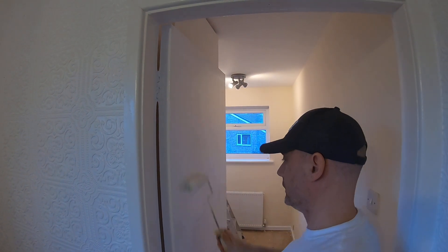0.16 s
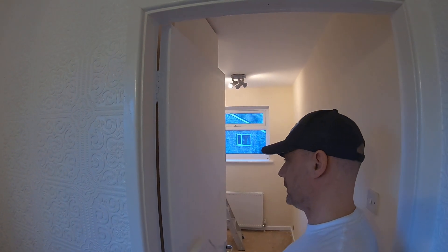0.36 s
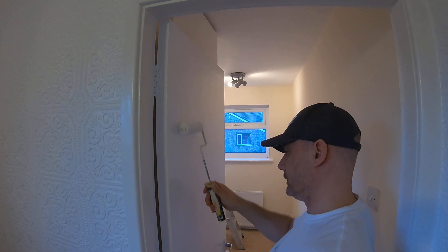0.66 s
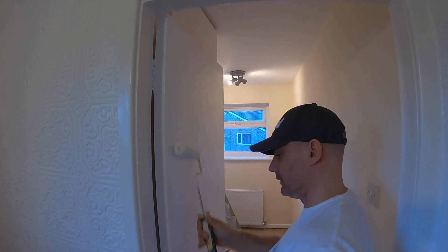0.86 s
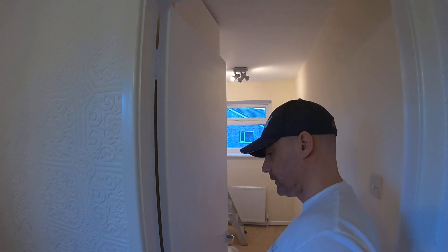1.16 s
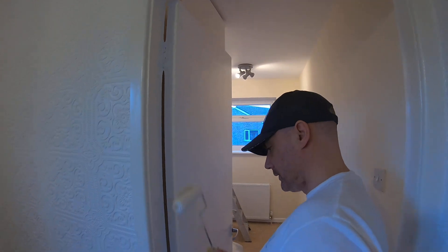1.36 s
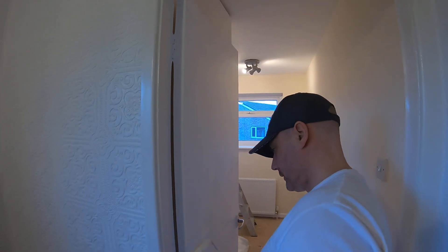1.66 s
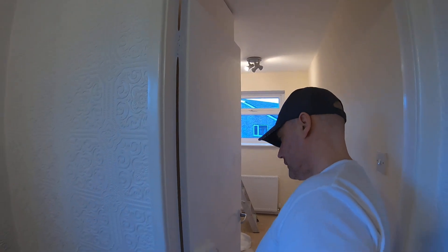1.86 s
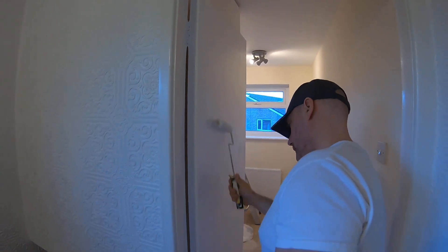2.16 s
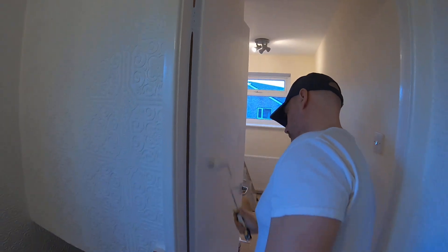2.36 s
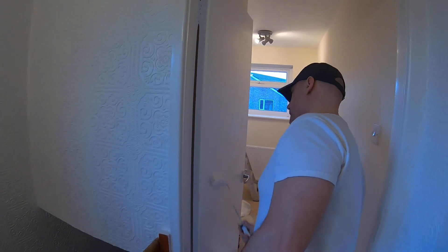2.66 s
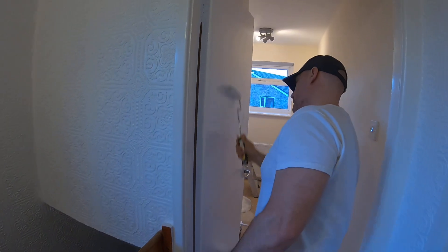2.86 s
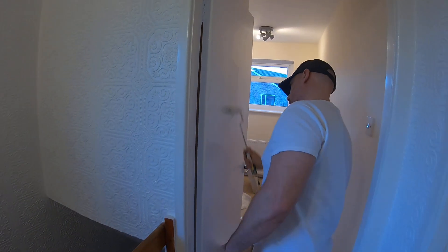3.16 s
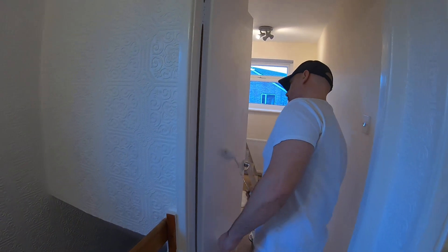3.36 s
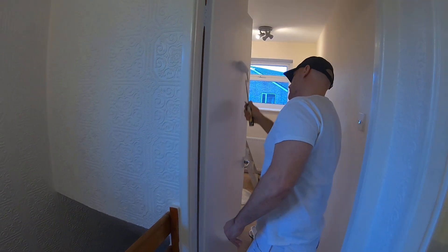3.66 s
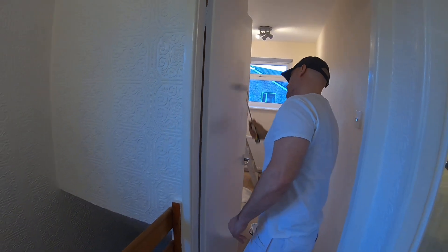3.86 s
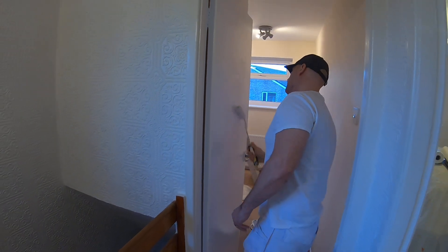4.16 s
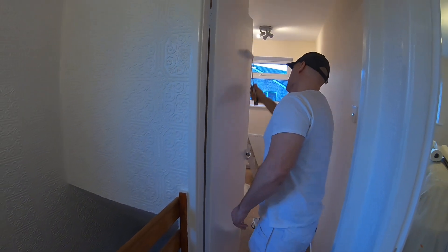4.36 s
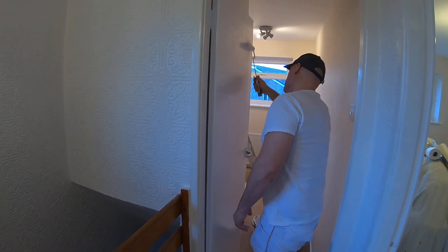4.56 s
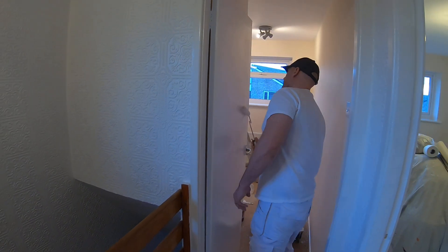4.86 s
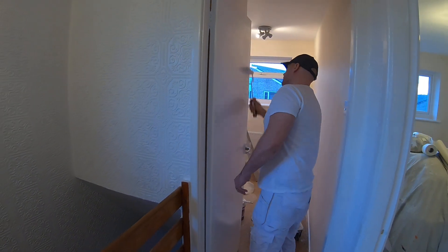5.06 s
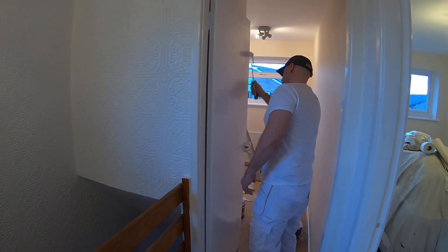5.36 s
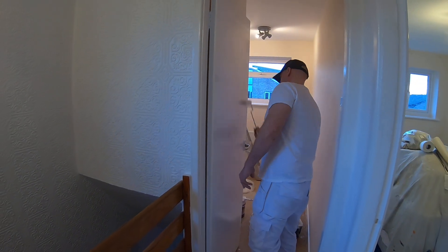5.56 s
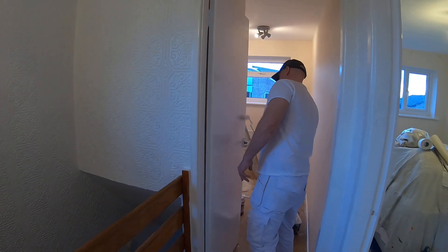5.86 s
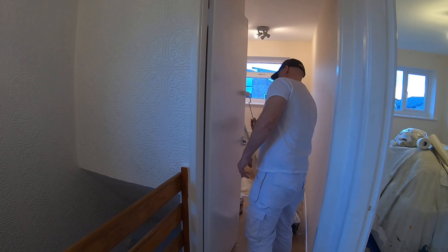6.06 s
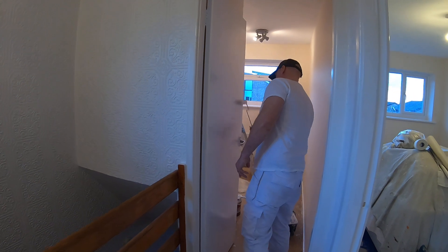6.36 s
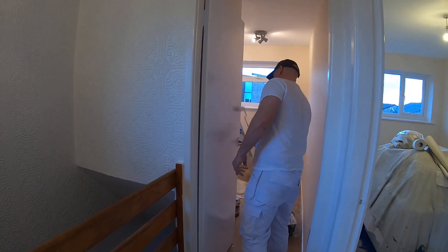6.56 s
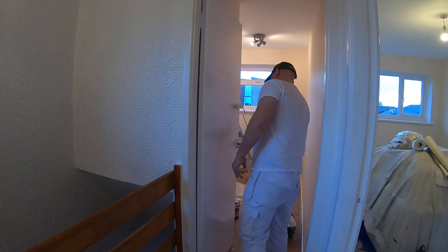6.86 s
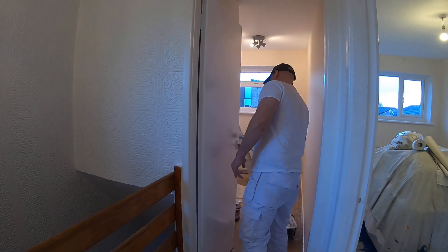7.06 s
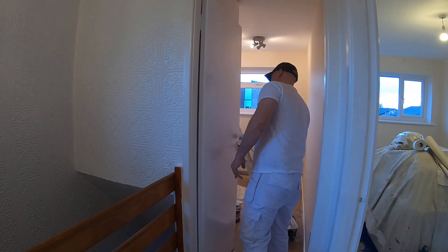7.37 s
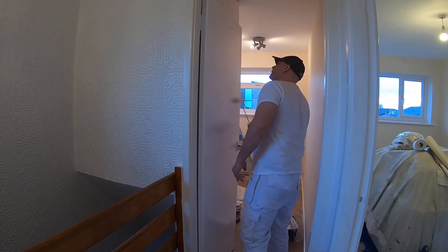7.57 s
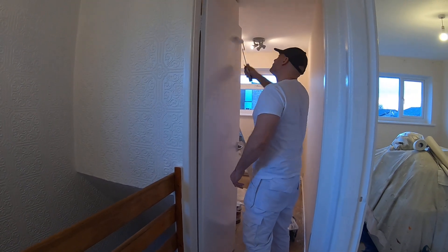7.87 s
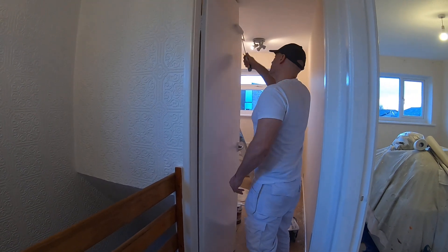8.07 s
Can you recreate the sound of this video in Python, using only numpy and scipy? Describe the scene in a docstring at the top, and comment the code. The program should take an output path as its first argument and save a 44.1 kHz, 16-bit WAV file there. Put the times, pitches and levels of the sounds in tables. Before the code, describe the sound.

A wet paint roller is already moving over a door in a small bare room, close to a hand-held stereo microphone. Strokes of about 0.3 to 0.5 seconds swell and soften at each turn, mixing sticky high sizzle, airy swish and a low, lumpy panel drone; the first strokes are brightest and loudest. A rough chafe comes at 1.2 s, and dull handling bumps from 1.4 s. From 1.8 to 4 s the microphone backs away and the crackle blurs into hiss. At about 2.3 s a short scuff runs into a hard, loud knock, mainly on the right, with a low sway after it. Rolling continues with finger rumbles. At 4.7 s a heavy double thud booms through the floor boards. From 5.9 s strokes grow fainter and quicker, with low chafes near 6.8 to 7.5 s, then a fuller droning stroke and soft bump around 7.8 to 8 s. The house stays quiet.

```python
"""A paint roller goes up and down a door in a small bare room, heard from a hand-held camera, over a quiet house.
From the start, each stroke speeds up and slows for the turn: random clicks and noise, coloured three ways, make
the wet nap sizzle, the sleeve swish and the door drone. Bursts of stick and slip chafe, and fingers rumble on the camera.
Bumps from 1.4 s ring the camera's case and mount; it backs away from 1.8 to 4 s, blurring the clicks into hiss.
At 2.3 s a scuff runs into a hard knock, mostly on the right; at 4.7 s a heavy double thud rings the floor boards."""
import sys
import numpy as np
from scipy import signal
from scipy.fft import rfft, irfft, next_fast_len
from scipy.io import wavfile

SR = 44100
rng = np.random.default_rng(int(sys.argv[2]) if len(sys.argv) > 2 else 0)


def master_out(mix):
    """Clip the mix to full scale and print it as 16-bit PCM to the path in sys.argv[1]."""
    frames = np.transpose(np.atleast_2d(mix))
    ceiling = np.clip(frames, -1, 1)
    pcm = np.round(ceiling * 32767).astype(np.int16)
    wavfile.write(sys.argv[1], SR, pcm)


N = 362943
TIME = np.arange(N) / SR


def from_db(db):
    """Turn decibels into gain."""
    return 10 ** (np.asarray(db) / 20)


def rms_one(x):
    """Scale a sound to rms 1."""
    return x / np.sqrt(np.mean(x ** 2) + 1e-20)


def colour(x, points, share=1):
    """Filter by a curve of (frequency [Hz], level [dB]), or by a share of its decibels."""
    size = next_fast_len(N)
    hz, db = np.transpose(points)
    bins = np.maximum(np.arange(size // 2 + 1) * SR / size, 1)
    curve_db = np.interp(np.log(bins), np.log(hz), db)
    return irfft(rfft(x, size) * from_db(share * curve_db), size)[..., :N]


def drift(rate):
    """Smooth random wandering of rms 1, with a new random target rate times a second."""
    knots = rng.standard_normal(4096)
    return rms_one(np.interp(TIME * rate, np.arange(len(knots)), knots))


def pan(pair, pan_db):
    """Lean a stereo pair to the left by pan_db; a negative value leans it to the right."""
    return pair * from_db(np.array([[pan_db], [-pan_db]]) / 2)


# how wide the sound spreads in the room, before each source's own width is added:
# (frequency [Hz], side minus middle [dB])
ROOM_WIDTH = [(100, -3.5), (380, -7.5), (750, 2), (1300, -2.5), (2400, -6), (4400, -7.5), (6800, -1),
              (8500, 0.5), (15000, -0.5)]


def in_room(direct, spectrum, width_db):
    """Colour a source and add spread-out sound that differs between the two ports; the middle has rms 1."""
    mid = colour(rms_one(direct), spectrum)
    diffuse = colour(rng.standard_normal(N), spectrum)
    side = from_db(width_db) * colour(diffuse, ROOM_WIDTH)
    return np.array([mid + side, mid - side]) / np.std(mid)


def ring(hz, t60):
    """One second of a struck mode: a sine that falls by 60 dB in t60 seconds."""
    t = TIME[:SR]
    return np.sin(2 * np.pi * hz * t) * from_db(-60 * t / t60)


def add(track, start_s, sound):
    """Mix a sound into a track at a given time."""
    at = int(round(start_s * SR))
    track[..., at:at + sound.shape[-1]] += sound[..., :N - at]


def snaps(per_s, spread_db, size=N):
    """Random clicks of either sign; a larger spread_db makes a few stand out from many small ones; rms 1."""
    born = rng.random(size) < per_s / SR
    sizes = from_db(spread_db * np.minimum(rng.exponential(1, size), 4.5))
    return rms_one(born * sizes * rng.choice([-1, 1], size))


# colours of the sticky nap, the sleeve and the droning door: (frequency [Hz], level [dB])
SIZZLE_COLOUR = [(2000, -26), (3500, -11.5), (5000, -12), (5900, -2.5), (6700, 0), (7600, -1.5),
                 (8300, -13), (9300, -19), (11300, -26), (12700, -25), (15500, -31.5)]
SWISH_COLOUR = [(500, 7), (950, 5.5), (1400, 8.5), (2300, 4), (2900, 4), (3500, 2.5), (4200, -7.5),
                (4800, -1), (8000, -15), (15000, -67)]
PANEL_COLOUR = [(70, -22), (150, 11), (280, 6), (420, 4.5), (560, 0.5), (780, -2.5), (1000, -17),
                (2000, -51)]
# where the painted door lies: (frequency [Hz], left minus right [dB])
DOOR_PAN = [(150, -2.5), (400, -3), (1300, 0), (4400, -1), (7000, 1), (15000, 1)]
SIZZLE_LAW, SWISH_LAW, PANEL_LAW = 1.69, 1.44, 1.72   # amplitude grows as speed to this power
SWISH_PRESSURE_SHARE = 0.61   # the swish follows pressure less than the panel does


def roller():
    """Paint threads snap behind the sleeve; the room blurs them into hiss, more so as the camera backs off."""
    speed, pressure_db, (sizzle, swish, panel) = stroke_motion()
    sizzle = lingering(sizzle * speed ** SIZZLE_LAW)
    swish = lingering(swish * speed ** SWISH_LAW * from_db(SWISH_PRESSURE_SHARE * pressure_db))
    panel = lingering(panel * speed ** PANEL_LAW * from_db(pressure_db))

    near = np.interp(TIME, [1.8, 4.0], [.7, .35])   # direct share of the power
    clicks = np.sqrt(near) * snaps(per_s=3500, spread_db=1.5)
    hiss = np.sqrt(1 - near) * rng.standard_normal(N)
    threads = clicks + hiss

    sticky = reflected(in_room(threads, SIZZLE_COLOUR, width_db=-1.5))
    # a fast roller tears the threads more sharply: the top octave swells faster than the rest
    top = signal.sosfiltfilt(signal.butter(3, 8800, "high", fs=SR, output="sos"), sticky)
    tearing = sizzle / from_db(-53)
    sound = sizzle * (sticky + top * (tearing ** 0.19 - 1)) * from_db(3.0)

    sound += swish * reflected(in_room(threads, SWISH_COLOUR, width_db=1.5)) * from_db(-4.0)

    # the lumpy sleeve drums on the door
    drumming = reflected(in_room(snaps(per_s=1800, spread_db=4.5), PANEL_COLOUR, width_db=-3.5))
    sound += panel * drumming * from_db(-0.05 + 1.75 * drift(25))

    uneven_nap_db = 1.0 * drift(40) + .5 * drift(130)   # the nap is unevenly loaded as it turns
    left, right = sound * from_db(uneven_nap_db)
    return np.array([colour(left, DOOR_PAN, share=.5), colour(right, DOOR_PAN, share=-.5)])


# strokes of the roller, each lasting until the next; levels are those at top speed and middle pressure,
# before the roller's final mix: (start [s], share of top speed kept at its opening turn [0-1, more counts as 1],
# place of top speed in the stroke [0-1, kept between .05 and .95], sticky sizzle [dB], sleeve swish [dB],
# door panel [dB], rise of the pressure from start to end [dB])
STROKES = [(-0.086, 0.3, 0.65, -43.0, -51.0, -53.5, 9), (0.431, 0.33, 0.51, -49.5, -54.5, -51, 6),
           (0.808, 0.34, 0.62, -43, -50.0, -52.5, 9), (1.265, 0.38, 0.53, -53.5, -53.5, -53, -19),
           (1.539, 0.5, 0.41, -45.5, -57, -56, -1), (1.895, 0.11, 0.61, -50.5, -53.5, -51.5, 12),
           (2.248, 0.39, 0.68, -50.5, -58, -55.5, -9.5), (2.645, 0.22, 0.72, -52.5, -56.5, -56, 13),
           (3.085, 0.31, 0.54, -49.5, -54.5, -53, 12), (3.435, 0.43, 0.67, -51.5, -55, -54, 10),
           (3.815, 0.26, 0.59, -49.0, -54, -52, 14), (4.153, 0.38, 0.64, -50.5, -51.5, -50.5, -4),
           (4.594, 0.38, 0.44, -49, -54.5, -52.5, 1), (4.952, 0.47, 0.55, -53, -56, -56.0, 2),
           (5.369, 0.41, 0.35, -49, -53.5, -53.5, 19), (5.865, 0.31, 0.62, -54, -64, -54.5, 4),
           (6.132, 0.29, 0.5, -53.0, -59.5, -60.5, 17), (6.361, 0.34, 0.42, -54, -61, -51.5, 15),
           (6.554, 0.37, 0.65, -50.5, -61.5, -55.5, 11), (6.745, 0.2, 0.64, -55.0, -63, -52, 9),
           (6.922, 0.56, 0.62, -50.5, -59.5, -53, 2), (7.165, 0.36, 0.5, -59.0, -64, -58, 14),
           (7.323, 0.6, 0.15, -56.5, -60, -59, 13), (7.483, 0.52, 0.6, -52.5, -60, -54.5, -7),
           (7.889, 1.07, 0.04, -52.5, -55, -49, 6), (8.098, 0.33, 0.28, -55.5, -55, -58.0, -3)]
LAST_TURN_S = 8.5   # end of the last stroke


def stroke_motion():
    """The arm's motion: share of top speed, pressure in dB, and the top gains of sizzle, swish and panel."""
    starts, turn_speeds, fastest_at, sizzle_db, swish_db, panel_db, rise_db = np.transpose(STROKES)
    turns = np.append(starts, LAST_TURN_S)
    stroke = np.clip(np.searchsorted(turns, TIME) - 1, 0, len(starts) - 1)
    progress = (TIME - turns[stroke]) / np.diff(turns)[stroke]

    crest = np.clip(fastest_at[stroke], .05, .95)
    swing = np.clip(np.minimum(progress / crest, (1 - progress) / (1 - crest)), 0, 1)
    slowest = np.clip(np.interp(TIME, starts, turn_speeds), 0, 1)
    speed = slowest + (1 - slowest) * np.sin(np.pi / 2 * swing)

    pressure_db = rise_db[stroke] * (progress - .5)
    return speed, pressure_db, from_db([sizzle_db[stroke], swish_db[stroke], panel_db[stroke]])


LINGER_S = 0.021   # time constant with which the room holds the power


def lingering(gain):
    """The room holds on to the power of a sound, which softens every change of level."""
    keep = np.exp(-1 / (LINGER_S * SR))
    power = signal.lfilter([1 - keep], [1, -keep], gain ** 2, zi=[gain[0] ** 2])[0]   # zi: no fade-in
    return np.sqrt(power)


# reflections from the door, frame and painter, before rescaling for the added power:
# (average delay [s], level [dB])
REFLECTIONS = [(.0026, -15), (.0047, -16), (.0079, -19.5), (0.012, -18), (.0190, -12.5)]


def reflected(x):
    """Near surfaces echo the sound; their paths change as the arm moves, so the colour keeps shifting."""
    out, power, sway_s = x.copy(), 1, .00025
    for delay_s, db in REFLECTIONS:
        lag = np.round((delay_s + sway_s * drift(1.6)) * SR).astype(int)
        out += from_db(db) * x[:, np.clip(np.arange(N) - lag, 0, N - 1)]
        power += from_db(db) ** 2
    return out / np.sqrt(power)


# the sleeve chafing as it lands or turns, level before the swell:
# (time [s], level [dB], length of the fall [s], resonance [Hz], width of the resonance [Hz])
CHAFES = [ (0.085, -49.5, 0.35, 430, 248), (0.543, -52, 0.14, 600, 400), (1.196, -40.5, 0.083, 570, 170),
          (1.205, -45, 0.078, 263, 200), (1.213, -41.5, 0.021, 1200, 900), (1.6, -53, 0.12, 750, 120),
          (2.004, -48.5, 0.019, 816, 260), (4.36, -54, 0.22, 284, 70), (5.936, -58.5, 0.22, 480, 350),
          (6.426, -59, 0.088, 560, 400), (6.813, -64, 0.16, 1380, 600), (6.825, -49.5, 0.23, 255, 90),
          (6.995, -43, 0.043, 340, 44.7), (7.539, -49, 0.24, 215, 79.5), (7.953, -60, 0.24, 1580, 500),
          (7.976, -45.5, 0.046, 720, 300), ]


def chafes():
    """Short runs of stick and slip, each ringing one resonance of the roller or the door."""
    out, t = np.zeros((2, N)), TIME[:SR]
    for s, db, length_s, hz, width_hz in CHAFES:
        slips = np.array([snaps(per_s=1500, spread_db=4.0, size=SR) for port in range(2)])
        rasp = rms_one(signal.lfilter(*signal.iirpeak(hz, hz / width_hz, fs=SR), slips))
        swell = (1 - np.exp(-t / 0.0017)) * np.exp(-(t / length_s) ** 2)
        both_ports = rasp + 0.19 * rasp[::-1]   # each port also gets a little of the other
        add(out, s, from_db(db) * swell * both_ports)
    return out


def struck(modes):
    """All modes of a part of the camera ring together, as the left and right ports get them."""
    return sum(from_db(db) * ring(hz, t60) * np.array([[left], [right]]) for hz, db, t60, left, right in modes)


# bumps on the camera; the knock level is its peak before the hand stills it: (time [s], gain of mount sway [dB],
# time until the hand stills it [s], case knock [dB], contact cut-off [Hz])
BUMPS = [ (1.421, -18, 0.08, -20, 288), (1.473, -31, 0.018, -21.5, 239), (1.532, -24.5, 0.1, -28.5, 200),
         (1.634, -24.5, 0.089, -35, 180), (2.088, -32, 0.014, -29, 193), (2.3520, -18, 0.29, 0.5, 3200),
         (2.3840, -16.5, 0.38, -8, 2300), (3.054, -53, 0.024, -33, 190), (3.559, -32, .06, -47, 160),
         (4.051, -58, 0.058, -24.5, 212), (4.276, -39, 0.062, -33.5, 180), (4.414, -47, 0.069, -31, 330),
         (5.607, -33.5, 0.068, -53, 200), (7.129, -37, 0.014, -32, 230), (7.177, -31.5, 0.094, -52, 200),
         (7.812, -54, 0.024, -17, 280), (8.114, -39, 0.068, -30.5, 302), ]
# sway of the camera mount, whose two close modes beat, and ring of the camera case, before each bump's gain:
# (frequency [Hz], level [dB], t60 [s], signed share in the left port, signed share in the right port)
MOUNT_MODES = [(31.6, -14, 1, -.25, -0.58), (61.7, 3, 0.7, 0.17, 1), (70.6, -13, 1, .26, 1)]
CASE_MODES = [(109, -20, 0.1, .2, -0.2), (170, 4, 0.057, 0.012, 0.96), (205, 1.5, 0.037, .1, 0.88),
              (301.5, 2, 0.18, -0.1, 0.9), (372, -2, 0.031, 0.3, 1), (477, -5, 0.038, -0.39, 0.95),
              (632, -3, 0.1, 0.6, -0.96), (663, -2.5, 0.019, 0.22, -1.2), (1226, -14, 0.031, 0.87, -0.49),
              (1360, -14, 0.033, 0.96, -0.48), (1710, -14.5, 0.027, 0.53, -1.07),
              (1900, -28, 0.027, 0.23, -1), (2500, -23, 0.0076, -0.41, -1)]


def bumps():
    """Each bump sets the case ringing and the mount swaying; a soft contact leaves out the high modes."""
    out, case, t = np.zeros((2, N)), struck(CASE_MODES), TIME[:SR]
    mount_cut_hz = 130   # the rubbery mount passes on only the slow part of a blow
    sway = signal.sosfilt(signal.butter(2, mount_cut_hz, fs=SR, output="sos"), struck(MOUNT_MODES))
    for s, sway_db, free_s, knock_db, contact_hz in BUMPS:
        knock = signal.sosfilt(signal.butter(3, contact_hz, fs=SR, output="sos"), case)
        knock = from_db(knock_db) * knock / np.abs(knock).max()
        stilled = np.exp(-(t / free_s) ** 4)
        add(out, s, stilled * (knock - from_db(sway_db) * sway))
    return out


# the fingers shift on the camera, levels before mixing:
# (middle [s], half length [s], rumble [dB], deep flutter [dB])
GRIP_SHIFTS = [ (0.01, .03, -69, -52), (0.2, .05, -54.5, -51), (0.345, 0.042, -44.5, -59),
               (0.486, 0.043, -45.5, -60), (0.622, 0.065, -50.5, -46.5), (0.78, 0.057, -48, -53),
               (1.21, 0.058, -37, -45), (1.4, 0.046, -41.5, -42.5), (1.676, 0.17, -46.5, -43),
               (1.895, .04, -42, -46), (2.055, 0.039, -42, -60), (3.06, 0.039, -59, -54),
               (3.604, 0.07, -45.5, -46), (3.722, 0.056, -50, -40), (4.083, .03, -46, -55),
               (4.30, 0.033, -41.5, -62), (4.46, .04, -46, -66), (4.61, .06, -42, -47),
               (4.998, 0.15, -47, -51.5), (5.232, 0.13, -45.5, -53), (5.626, 0.084, -40.5, -60),
               (5.8, .11, -39, -41), (6.336, .16, -51.5, -49), (6.73, 0.077, -50, -47.5),
               (7.122, .03, -55.5, -45), (7.438, 0.075, -55.5, -52.5), (7.73, 0.034, -43, -56),
               (7.826, 0.026, -46, -46), (8.152, 0.066, -45, -42)]
RESTING_RUMBLE_DB, RESTING_FLUTTER_DB = -63.5, -63   # a still hand, before mixing
# a hand dragging on the camera just before the hard knock, before panning: (time [s], level [dB])
SCUFF = [(2.27, -65), (2.305, -46.5), (2.33, -41.5), (2.348, -44)]
# colours of the deep flutter, the rumble and skin dragging on the case: (frequency [Hz], level [dB])
FLUTTER_COLOUR = [(12, -25), (30, 5.5), (42, -3.5), (60, -23), (150, -37), (1000, -94)]
RUMBLE_COLOUR = [(25, -22), (48, -10.5), (72, 7), (100, -7), (150, -7), (250, -17.5), (600, -41),
                 (2000, -81)]
SKIN_COLOUR = [(60, -15), (160, 11), (320, 6), (520, 1.5), (680, -17), (850, -27), (1600, -18), (3000, -49)]


def grip():
    """Each shift of the fingers swells and fades as a lumpy rumble; a brief scuff runs into the knock."""
    level, deep = from_db(RESTING_RUMBLE_DB), from_db(RESTING_FLUTTER_DB)
    for s, half_s, rumble_db, flutter_db in GRIP_SHIFTS:
        swell = np.exp(-.5 * np.minimum(((TIME - s) / half_s) ** 2, 20))
        level = np.maximum(level, from_db(rumble_db) * swell)
        deep = np.maximum(deep, from_db(flutter_db) * swell)
    flutter = deep * from_db(-2.5) * in_room(rng.standard_normal(N), FLUTTER_COLOUR, width_db=-11.0)
    lumps = from_db(-4.5 + 1.7 * drift(20))
    rumble = level * lumps * in_room(rng.standard_normal(N), RUMBLE_COLOUR, width_db=-1.5)

    drag = from_db(np.interp(TIME, *np.transpose(SCUFF)))
    during = (TIME > SCUFF[0][0]) & (TIME < SCUFF[-1][0])
    scuff = drag * during * in_room(snaps(per_s=2400, spread_db=0.0), SKIN_COLOUR, width_db=-14.0)
    return pan(flutter, pan_db=-17.0) + pan(rumble, pan_db=-9.5) + pan(scuff, pan_db=-20.0)


# the two hits of the heavy thud on the floor boards: (time [s], gain [dB])
THUDS = [(4.705, -22), (4.770, -28.5)]
# ringing floor boards, before the gain of each hit: (frequency [Hz], level [dB], t60 [s])
FLOOR_MODES = [(35.2, -10, 0.71), (77, -5.5, 0.6), (119.8, -2, 0.46), (140.8, -5, 0.36), (184.5, -3, 0.32),
               (255, -3.5, 0.46), (333, -9, 0.42), (401, -8.5, 0.22)]
# colour of the room's boom: (frequency [Hz], level [dB])
BOOM_COLOUR = [(30, -8), (90, 6), (200, 7), (420, -11), (680, -21), (1000, -36), (3000, -56)]


def thuds():
    """The floor boards ring under a heavy step and the room booms after them."""
    out, t = np.zeros((2, N)), TIME[:SR]
    # neighbouring modes start in opposite directions
    boards = sum((-1) ** k * from_db(db) * ring(hz, t60) for k, (hz, db, t60) in enumerate(FLOOR_MODES))
    boom_t60, rise_s = .42, .0015
    dying = (1 - np.exp(-t / rise_s)) * np.exp(-np.log(1000) * t / boom_t60)
    for s, db in THUDS:
        boom = dying * in_room(rng.standard_normal(N), BOOM_COLOUR, width_db=-8.0)[:, :SR]
        add(out, s, from_db(db) * (from_db(-5.0) * boards + from_db(-3.0) * boom))
    return out


# colour of the quiet house: (frequency [Hz], level [dB])
QUIET_COLOUR = [(25, -20), (100, 7.5), (300, -0.5), (1000, -15), (4000, -14.5), (15000, -55)]


def quiet_house():
    """Faint steady noise, spread wide, stands for the quiet of the house."""
    return from_db(-64) * in_room(rng.standard_normal(N), QUIET_COLOUR, width_db=9.0)


def scene():
    """Roller, camera handling and thud over the quiet of the house."""
    return roller() + chafes() + bumps() + grip() + thuds() + quiet_house()


def record(dry):
    """The microphone loses the deepest bass; the top is cut steeply."""
    low_cut_hz, top_cut_hz = 18, 15700
    sound = signal.sosfilt(signal.butter(2, low_cut_hz, "high", fs=SR, output="sos"), dry)
    return signal.sosfilt(signal.ellip(12, .1, 90, top_cut_hz, fs=SR, output="sos"), sound)


dry = scene()
out = record(dry)
master_out(out)
```